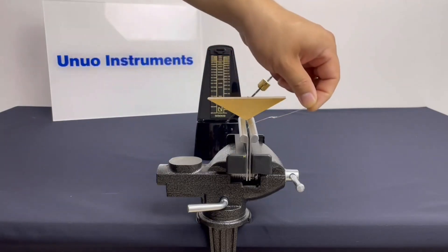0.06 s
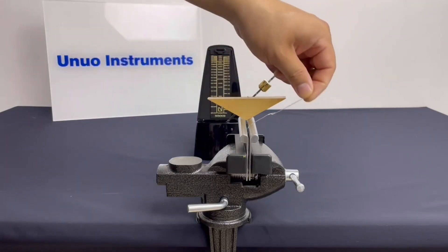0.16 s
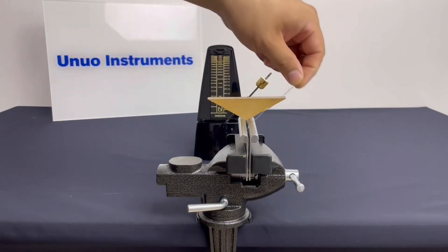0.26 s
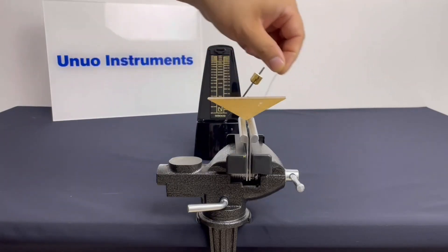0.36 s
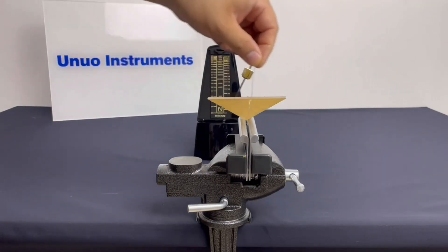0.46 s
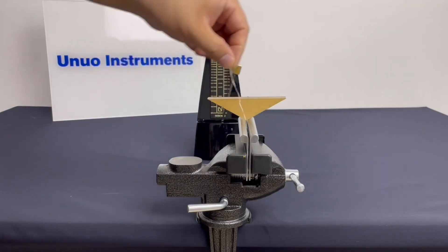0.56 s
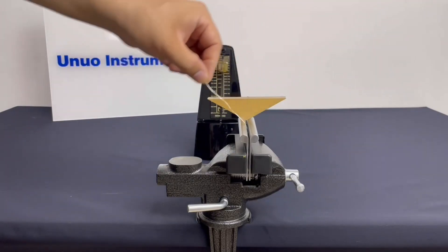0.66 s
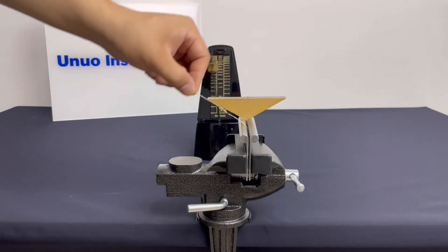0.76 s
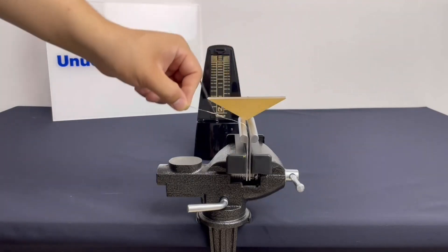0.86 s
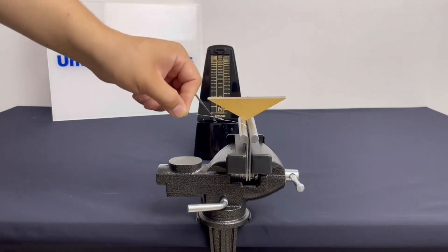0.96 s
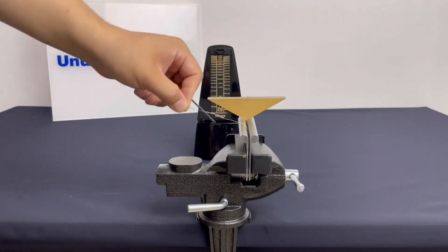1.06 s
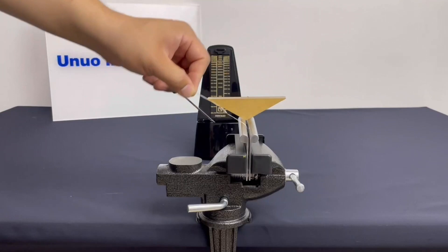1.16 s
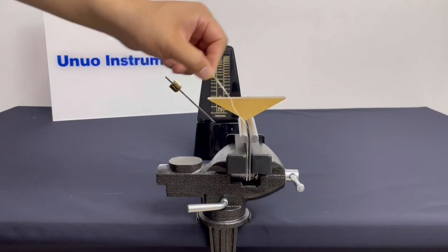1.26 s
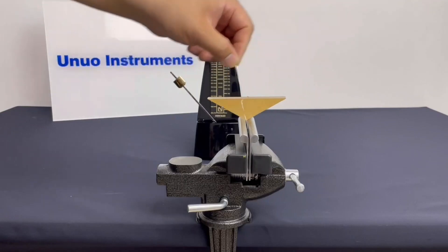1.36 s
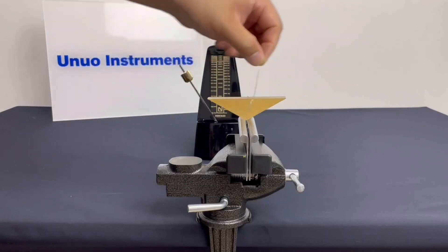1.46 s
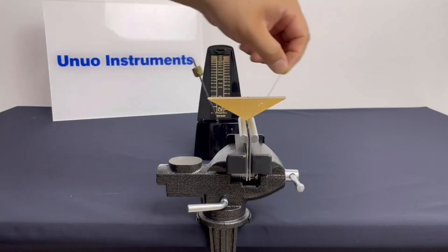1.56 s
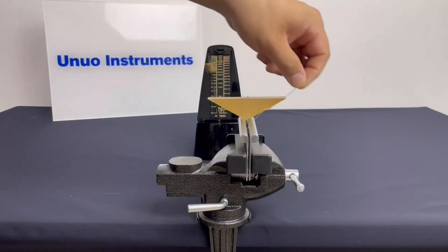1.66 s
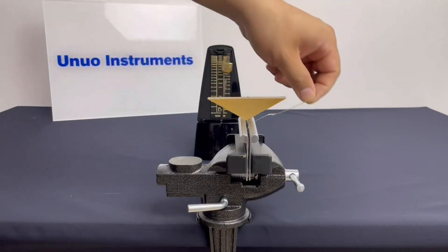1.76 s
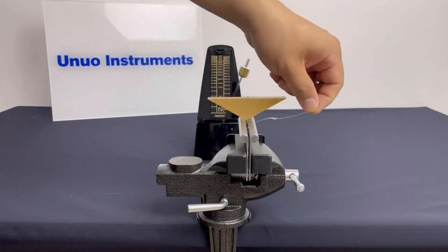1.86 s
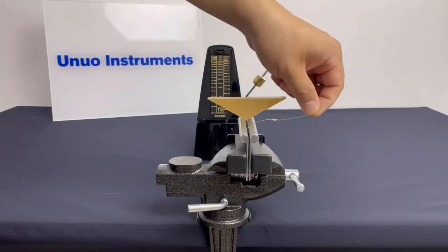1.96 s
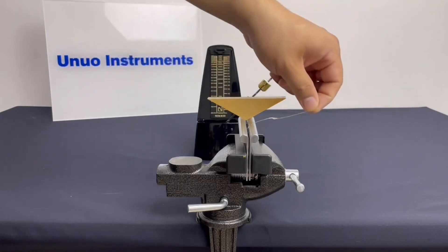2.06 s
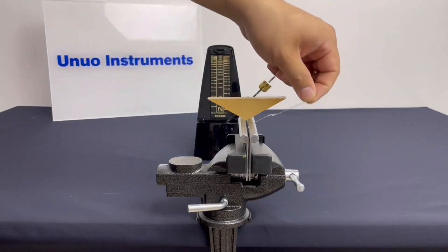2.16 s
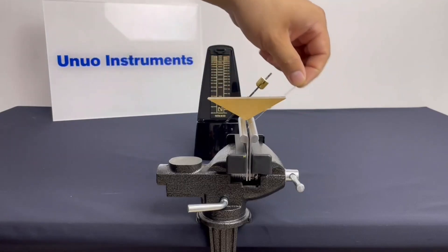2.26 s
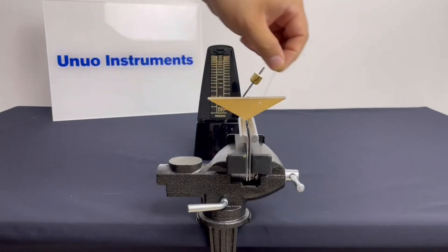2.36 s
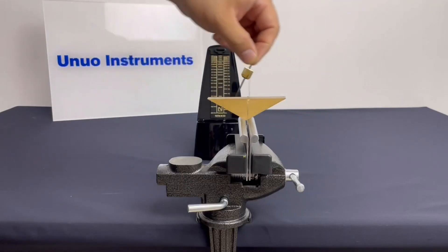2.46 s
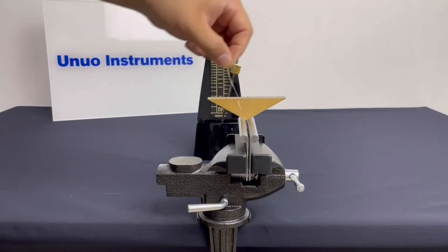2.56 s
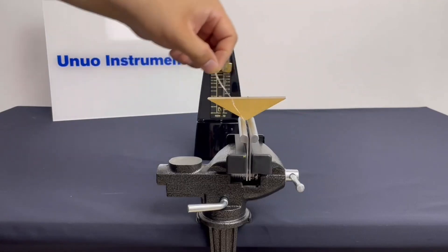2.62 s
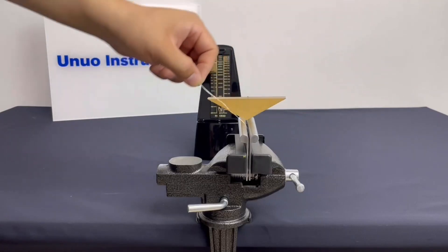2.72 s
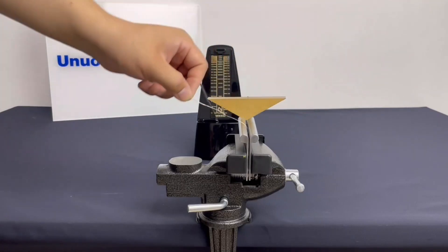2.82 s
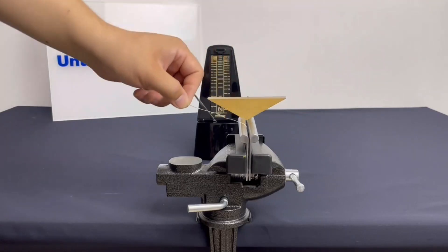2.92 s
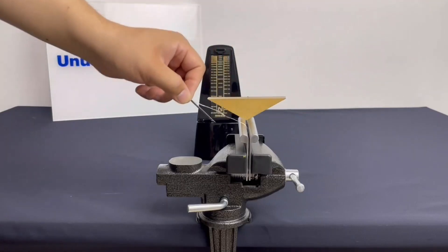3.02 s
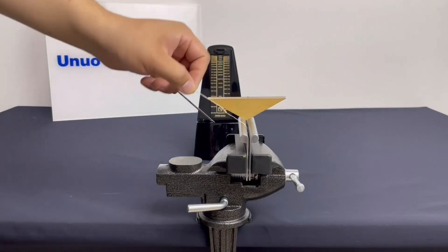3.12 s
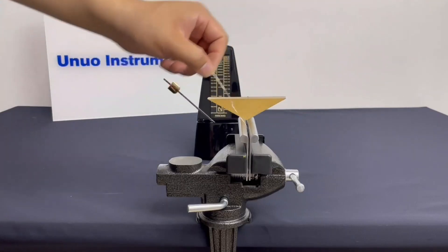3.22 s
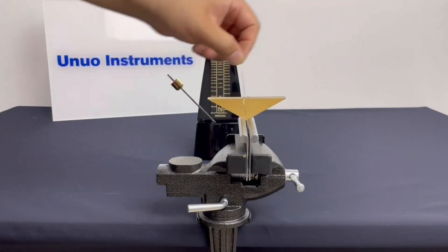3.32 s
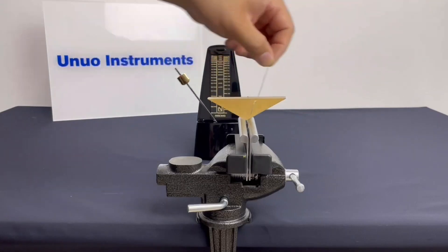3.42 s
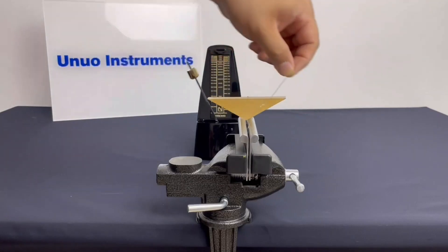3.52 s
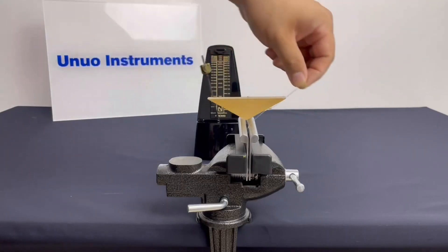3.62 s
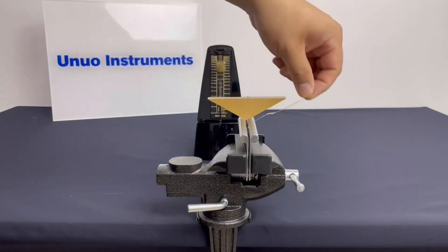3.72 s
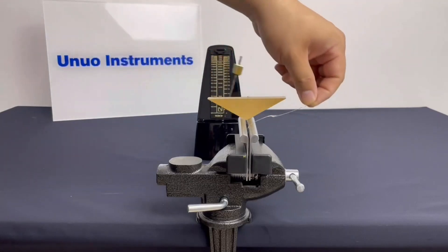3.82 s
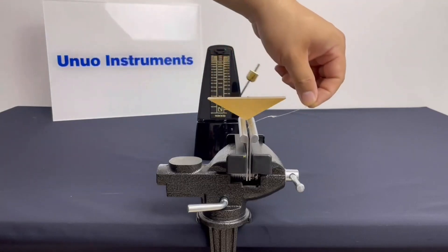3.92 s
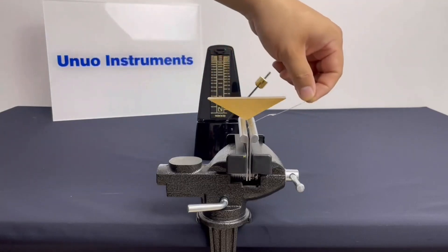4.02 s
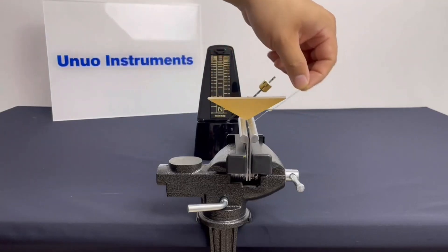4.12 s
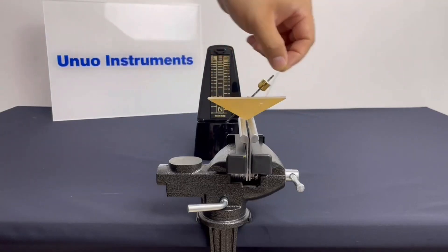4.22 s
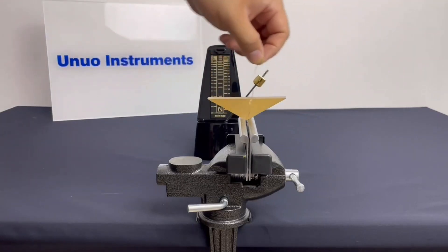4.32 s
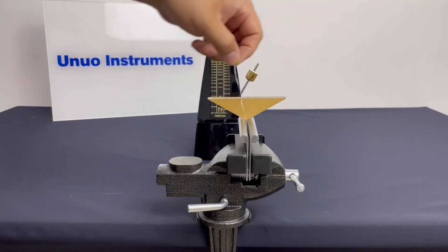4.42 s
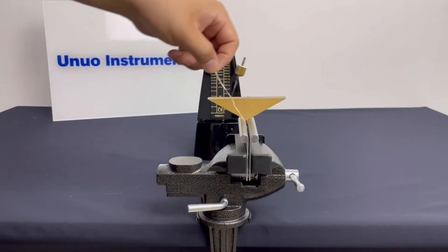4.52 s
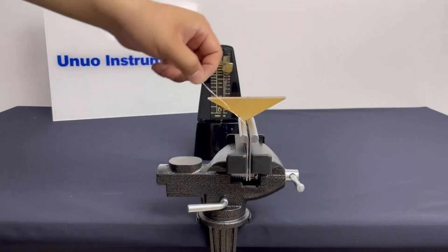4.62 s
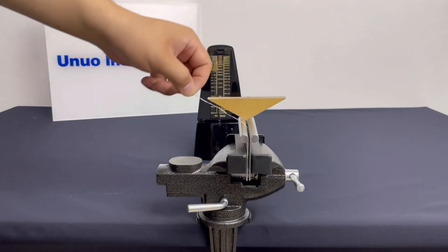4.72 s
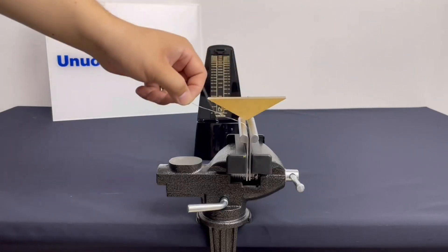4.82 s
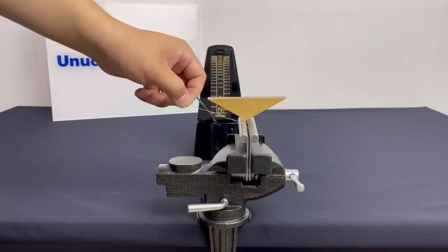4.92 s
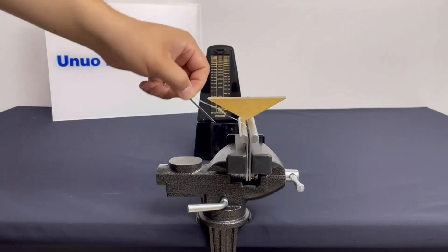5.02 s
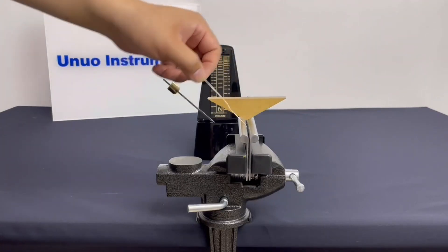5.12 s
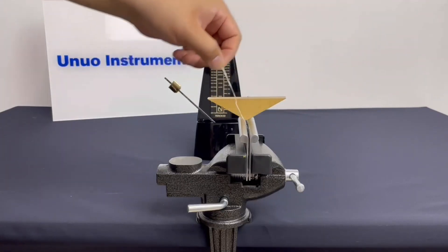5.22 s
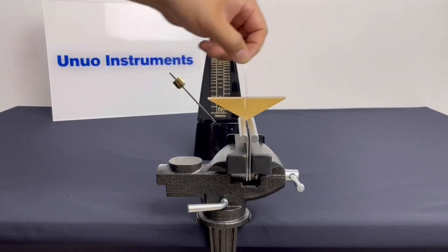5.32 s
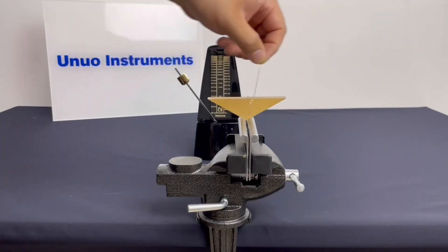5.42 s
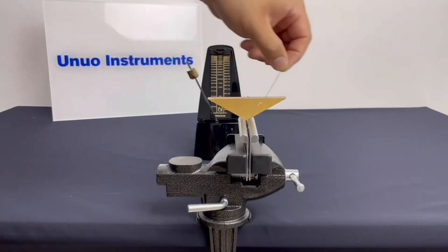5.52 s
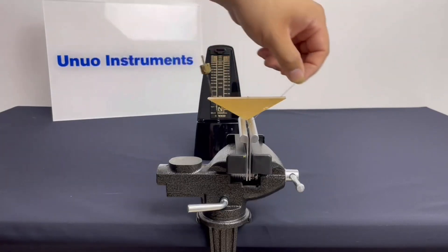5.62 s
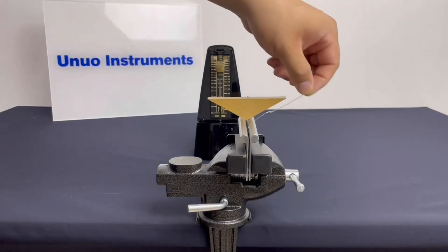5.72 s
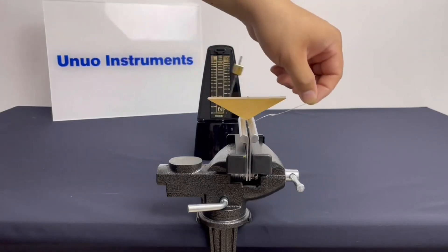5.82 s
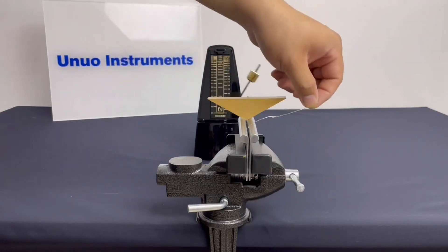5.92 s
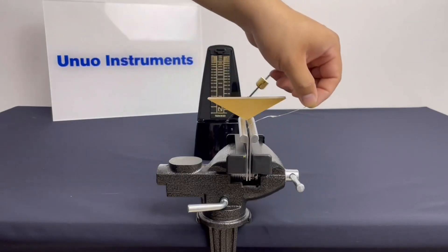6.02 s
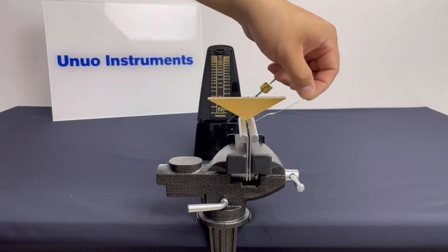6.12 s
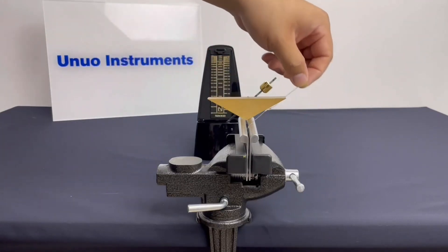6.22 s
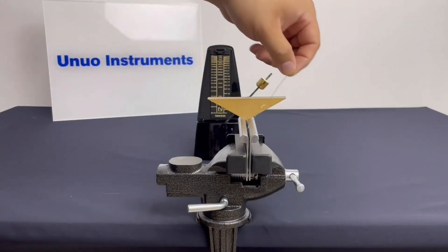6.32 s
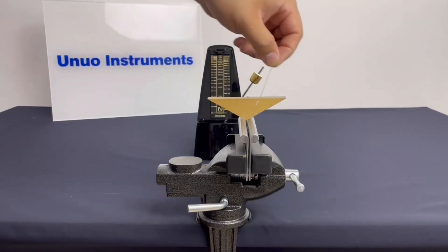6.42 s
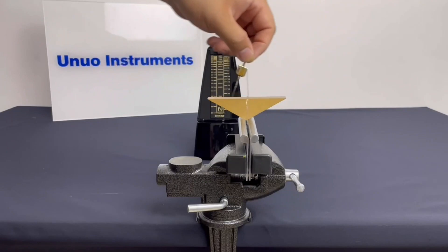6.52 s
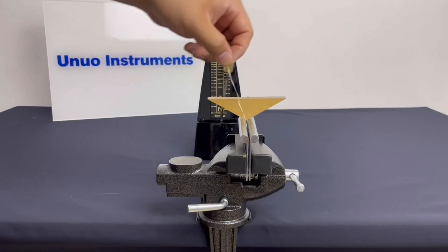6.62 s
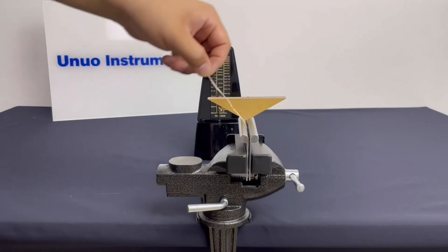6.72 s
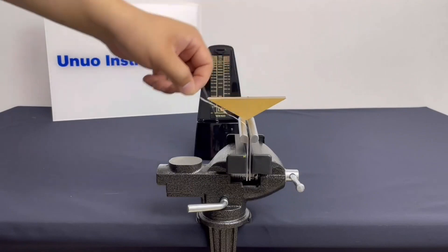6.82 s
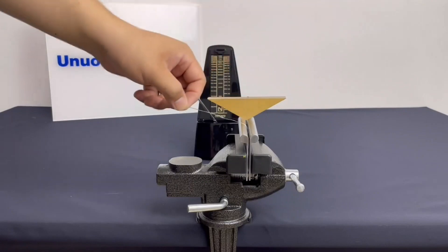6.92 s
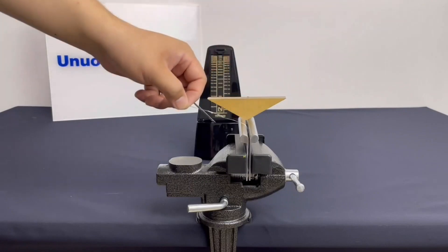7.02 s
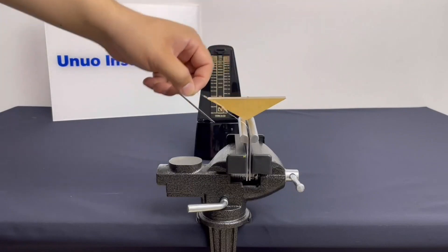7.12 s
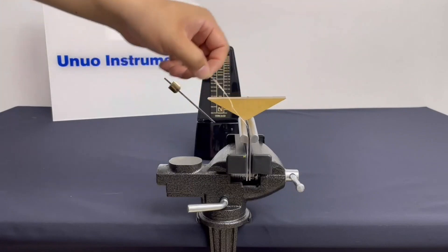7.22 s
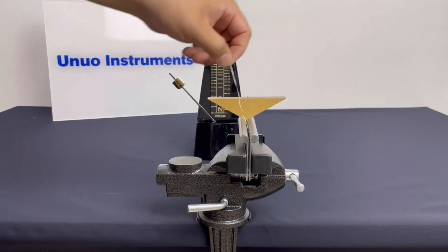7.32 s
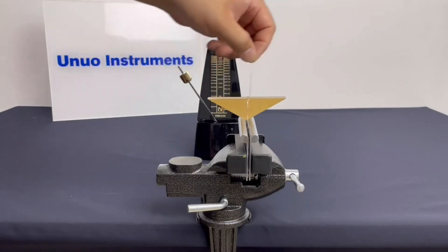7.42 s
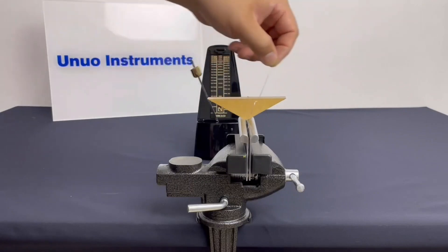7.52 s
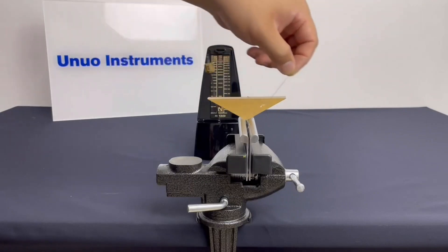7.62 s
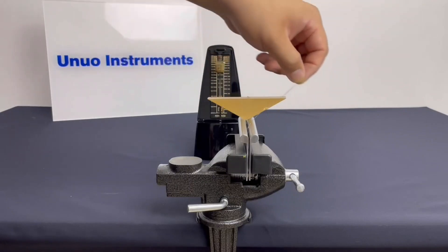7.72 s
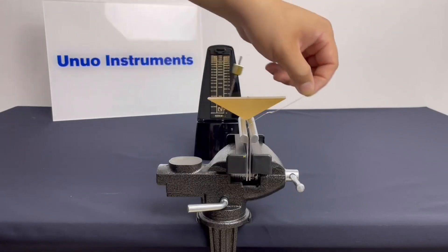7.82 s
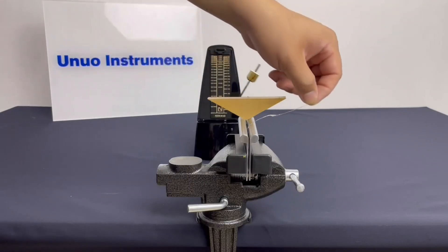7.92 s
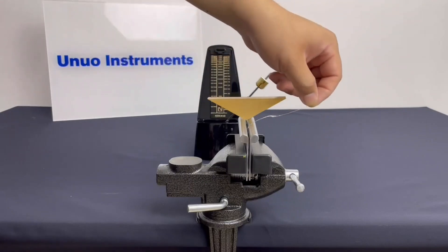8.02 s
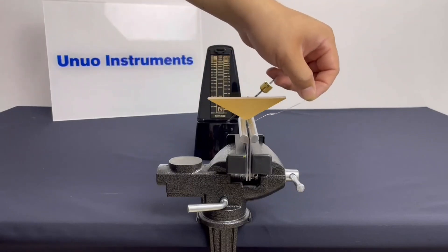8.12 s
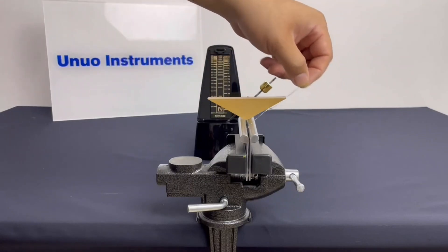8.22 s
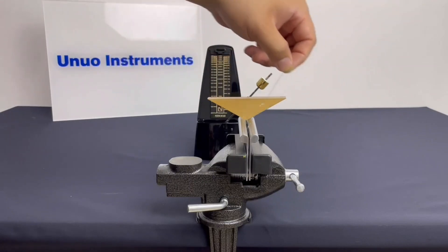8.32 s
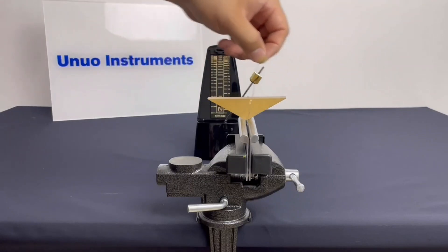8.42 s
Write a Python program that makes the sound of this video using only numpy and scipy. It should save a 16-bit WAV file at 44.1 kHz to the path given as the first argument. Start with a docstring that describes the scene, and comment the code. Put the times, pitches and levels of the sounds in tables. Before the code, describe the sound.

Eight sharp wooden-plastic clicks from a clockwork metronome, evenly spaced at one per second, the ticks a little brighter than the tocks. Each has a short hollow case rattle and a quick small-room tail. Between them a thin, glassy bell tone hangs quietly and shimmers above steady gentle hiss. Low airy gusts brush the microphone, mainly at the start, with a few barely audible crackles midway.

```python
"""Metronome with a faint bell

A pendulum metronome in a plastic case ticks about once a second on a cloth-covered bench in a small room.
Tick and tock are impulses that excite decaying case modes, a noisy rattle and a diffuse room answer.
Each blow sets its little bell ringing anew, tocks most: twin lowest modes beat and higher ones waver.
Filtered noise makes ventilation hiss, throbbing gusts and a few tiny crackles; short low sines make puffs."""
import sys
import numpy as np
from scipy import signal
from scipy.fft import rfft, irfft
from scipy.io import wavfile
from scipy.ndimage import uniform_filter1d

SR = 44100
rng = np.random.default_rng(int(sys.argv[2]) if len(sys.argv) > 2 else 0)


def wrap_up_sound(samples):
    """Save the sound to the file named by the first command line argument, as 16-bit audio."""
    columns = np.atleast_2d(samples).T
    # keep every value between -1 and 1, then stretch to whole-number steps
    tamed = np.clip(columns, -1, 1)
    steps = np.round(tamed * 32767).astype(np.int16)
    wavfile.write(sys.argv[1], SR, steps)


N = 373527

# Bell ring after each beat, beginning with a tock. Each row: start in seconds, upper twin of the lowest
# mode in dB, lower twin in dB, time after the start when the twins first cancel in seconds,
# second mode in dB, its drift in dB per second, third mode in dB.
BELL_RINGS = [(-.19, -44.5, -47.5, .29, -51, -0.9, -32.5), (.82, -48.5, -56.5, 0.17, -49, -15.5, -68),
              (1.802, -45, -48, 0.27, -50.5, 3.5, -41), (2.812, -48.5, -55, 0.14, -50, -7.5, -68),
              (3.81, -45, -46.5, 0.3, -50, 1, -37), (4.82, -48, -55.5, 0.15, -52, -6.5, -68),
              (5.81, -44.5, -51.5, 0.28, -46.5, 1.5, -35), (6.824, -47, -54.5, .15, -48.5, -9, -66),
              (7.811, -44.5, -46.5, .29, -54.5, 14.5, -30.5)]
# Spectrum of the steady hiss. Each row: frequency in Hz, relative level in dB.
HISS_SPECTRUM = [(110, -55.5), (170, -12), (240, -7), (350, -2), (500, -8.5), (760, -11.5), (830, -16.5),
                 (1200, -16), (2300, -21), (4300, -32), (4700, -41), (5500, -56.5), (5800, -71),
                 (8300, -59.5), (9800, -46.5), (12000, -45.5), (14000, -61.5)]
# Gust strength before throbbing. Each row: time in seconds, level of the deepest air in dB.
GUST_LEVELS = [(0.0, -41), (0.16, -28), (0.21, -42.5), (0.52, -62), (0.59, -46), (0.64, -67.5),
               (3.23, -57.5), (3.3, -48.5), (3.35, -67.5), (4.76, -69.5), (4.88, -53), (5.47, -63),
               (5.71, -91), (5.78, -66), (6.16, -73), (6.27, -59.5), (6.67, -100), (6.84, -63),
               (7.62, -58.5), (7.71, -86), (8.0, -70), (8.47, -75)]
# Soft low puffs of air on the microphone. Each row: start in seconds, level in dB, frequency in Hz.
AIR_PUFFS = [(0.6, -32, 189), (1.108, -35.5, 175), (1.466, -31.5, 332), (1.527, -36, 264),
             (3.074, -34.5, 210), (3.289, -45, 129), (4.918, -41, 183), (5.424, -36, 350), (7.6, -40, 253)]
# Escapement blows, tick and tock in turn. Each row: start in seconds, level in dB.
ESCAPEMENT_BLOWS = [(.8182, -6.5), (1.8016, -6.5), (2.8113, -6), (3.81, -6.5), (4.8198, -6), (5.8103, -6.5),
                    (6.8233, -6.5), (7.8106, -7)]
# Case modes. Each row: frequency in Hz, relative level in dB on a tick, relative level in dB on a tock,
# 60 dB decay time in seconds.
CASE_MODES = [(320, -8.5, -16, 0.18), (369.3, -13, -16, 0.21), (424.5, -10.5, -12.5, 0.17),
              (567, -21, -10, 0.089), (683, -7, -7.5, 0.13), (974.4, -7, -10, 0.15),
              (1096.4, -1.5, -4.5, 0.075), (1270, -11.5, -12.5, 0.044), (1408, -1, -2.5, 0.037),
              (1690, -27, -36.5, .04), (1890, 9.5, -5, 0.049), (1966, 4, -2, 0.079),
              (2190, -6.5, -10.5, 0.072), (2572, 8, 1, 0.011), (2460, -25, -15, 0.038),
              (3300, -12, -6.5, 0.044), (3445, -5.5, -12.5, 0.029), (4104, -10, -9.5, .05),
              (4685, -14.5, -18, 0.042), (5125, -14, -23.5, 0.062), (5368, -3.5, -5, 0.038),
              (6850, -24, -17.5, 0.06), (7600, -26, -18.5, .04), (8740, -15.5, -19.5, 0.034),
              (10875, -3, -12, 0.01), (11330, -27, -13, .04), (11300, -15, -16.5, .05)]
# Contacts inside one blow as the tooth lands and chatters. Each row: delay in milliseconds, level in dB.
TOOTH_CONTACTS = [(0, 7.5), (.8, 9.5), (2.9, -5), (4.1, -3.5), (7.6, -18.5), (9.6, -8.5)]
# Spectrum of the case rattle. Each row: frequency in Hz, relative level in dB on a tick,
# relative level in dB on a tock.
RATTLE_SPECTRUM = [(150, -31, -28.5), (300, -6.5, -7.5), (1200, -4, -6.5), (2500, -15.5, -14.5),
                   (3200, -8, -11), (5060, -16.5, -16), (7120, -15, -8.5), (8180, -29, -26.5),
                   (9060, -21.5, -20.5), (11250, -16, -10.5), (13550, -29.5, -36), (14800, -76.5, -56.5)]
# Room answer to a click. Each row: frequency in Hz, relative level in dB, 60 dB decay time in seconds.
ROOM_TAIL = [(151.4, -8, 0.32), (415, 10, 0.5), (730, -6, 0.16), (1030, -7.5, 0.54), (1320, -11, 0.45),
             (1860, -4.5, .4), (2930, -8.5, .42), (4840, 0.5, 0.41), (7900, -7, 0.21), (8200, -19, 0.45),
             (8500, -5, 1), (11900, -5.5, 0.28), (13880, -5, .3), (14800, -15.5, .3)]
# Tiny crackles. Each row: start in seconds, level in dB.
CRACKLE_SNAPS = [(2.612, -59), (4.371, -54.5), (4.3974, -58), (4.4114, -55), (4.4205, -51)]

BELL_LOW_HZ, BELL_MID_HZ, BELL_TOP_HZ = 1995.5, 5244.8, 9449.
TWIN_GAP_HZ = 3.23
BELL_LOW_T60, BELL_TOP_T60 = 5.65, 0.43  # seconds
# the second mode wavers slowly after a tick, barely after a tock
WAVER_HZ, WAVER_PEAK_S, TICK_WAVER_DB, TOCK_WAVER_DB = 2.9, 0.32, 1.5, 0.3
HISS_DB = -47.5
# the rush above the deepest air follows the gusts more gently; it has RUSH_DB at a gust level of CALM_DB
RUSH_DB, RUSH_DB_PER_GUST_DB, CALM_DB = -52.5, 0.43, -64
RECORDER_TOP_HZ = 14900


def undb(db):
    """Logarithmic level: decibels to amplitude gain."""
    return 10 ** (np.asarray(db) / 20)


def colour(x, hz, db):
    """Spectral shaping: points joined on a log-frequency axis weight the spectrum; rms 1."""
    f = np.maximum(np.fft.rfftfreq(len(x), 1 / SR), 1)
    gain = undb(np.interp(np.log(f), np.log(hz), db))
    y = irfft(rfft(x) * gain, len(x))
    return y / np.std(y)


def band(x, lo_hz, hi_hz):
    """Band-pass filtering, kept only once the filter has settled; rms 1."""
    sos = signal.butter(3, [lo_hz, hi_hz], "bandpass", fs=SR, output="sos")
    y = signal.sosfilt(sos, np.tile(x, 2))[len(x):]
    return y / np.std(y)


def fall(t, t60):
    """Exponential decay by 60 dB in t60 seconds, silent before time zero."""
    return (t >= 0) * np.exp(-np.log(1000) * np.maximum(t, 0) / t60)


def walk(rate):
    """Slow random fluctuation: levels held 1 / rate s and smoothed twice; spread near 1."""
    hold = int(SR / rate)
    held = np.repeat(rng.standard_normal(N // hold + 1), hold)
    slewed = uniform_filter1d(uniform_filter1d(held, hold), hold)
    return 1.3 * slewed[:N]


def add(out, sound, s):
    """Superposition: mix a sound in at a time in seconds."""
    i = int(s * SR)
    out[i:i + len(sound)] += sound[:N - i]


def bell(t):
    """Modal beating: twin modes a few hertz apart interfere; each blow replaces the ring with a new one."""
    low_and_top, mid_db = np.zeros(N), np.zeros(N)
    ends = [row[0] for row in BELL_RINGS[1:]] + [N / SR]
    for k, (row, end) in enumerate(zip(BELL_RINGS, ends)):
        s, upper_db, lower_db, cancel_s, db, drift_db, top_db = row
        age = t - s
        upper_phase = 2 * np.pi * BELL_LOW_HZ * age
        lower_phase = upper_phase - 2 * np.pi * TWIN_GAP_HZ * (age - cancel_s)
        twins = undb(upper_db) * np.sin(upper_phase) - undb(lower_db) * np.sin(lower_phase)
        twins = twins * fall(age, BELL_LOW_T60)
        # the third mode builds up gradually, flutters and decays
        top = undb(top_db) * (1 - fall(age, 0.2)) ** 2 * np.sin(2 * np.pi * BELL_TOP_HZ * age)
        top = top * fall(age, BELL_TOP_T60) * undb(1.9 * walk(40))
        low_and_top += (t < end) * (twins + top)
        # odd rows follow a tick
        depth_db = TICK_WAVER_DB if k % 2 else TOCK_WAVER_DB
        waver_db = depth_db * np.cos(2 * np.pi * WAVER_HZ * (age - WAVER_PEAK_S))
        mid_db += (age >= 0) * (t < end) * (db + drift_db * age + waver_db)
    mid_db = uniform_filter1d(mid_db, size=SR // 100)
    # the other modes swell and sink with the second, but less
    low_and_top = low_and_top * undb(0.45 * (mid_db - mid_db.mean()))
    flutter = undb(1.5 * walk(30) + 0.77 * walk(370))
    mid = np.sqrt(2) * undb(mid_db) * flutter * np.sin(2 * np.pi * BELL_MID_HZ * t)
    return low_and_top + mid


def ventilation_hiss():
    """Broadband noise: a steady spectrum whose level wavers slowly below 7 kHz and flickers above."""
    hiss = colour(rng.standard_normal(N), *np.transpose(HISS_SPECTRUM))
    low = signal.sosfiltfilt(signal.butter(4, 7000, fs=SR, output="sos"), hiss)
    high = hiss - low
    return undb(HISS_DB) * (low * undb(0.44 * walk(7.2)) + high * undb(1.5 * walk(26)))


def gusts(t):
    """Turbulence: two low noise bands share one throb while their levels follow the gusts."""
    gust_db = np.interp(t, *np.transpose(GUST_LEVELS))
    throb = walk(11)
    deep = band(rng.standard_normal(N), 55, 122.6)
    deep = deep * undb(gust_db + 2.85 * throb + 1.2 * walk(30))
    # the rush grows no further once a gust passes -48 dB
    rush_db = RUSH_DB + RUSH_DB_PER_GUST_DB * (np.minimum(gust_db, -48) - CALM_DB)
    rush = band(rng.standard_normal(N), 120, 268)
    rush = rush * undb(rush_db + 2.5 * throb + 1.2 * walk(22))
    return deep + rush


def puffs():
    """Windowed oscillation: each puff is about three cycles of a low sine under a smooth hump."""
    out = np.zeros(N)
    for s, db, hz in AIR_PUFFS:
        t = np.arange(int(3.2 * SR / hz)) / SR
        add(out, undb(db) * np.hanning(len(t)) * np.sin(2 * np.pi * hz * t), s)
    return out


def case_ring(side, t):
    """Modal excitation: the train of tooth contacts is convolved with the decaying modes of the case."""
    modes = 0
    for k, (hz, *db, t60) in enumerate(CASE_MODES):
        # each mode's share varies a little from blow to blow
        size = undb(db[side] + 1.2 * rng.standard_normal())
        modes = modes - (-1) ** k * size * fall(t, t60) * np.sin(2 * np.pi * hz * t)
    push = np.zeros(SR // 50)
    for ms, db in TOOTH_CONTACTS:
        push[int(ms * SR / 1000)] = undb(db)
    ring = signal.fftconvolve(modes, push)[:len(t)]
    return ring / np.abs(ring).max()


def room_tail(t, grain):
    """Diffuse reverberation: noise bands half an octave apart, each with its own decay."""
    hz, db, t60 = np.transpose(ROOM_TAIL)
    noise = rfft(colour(grain, hz, db))
    octave = np.log2(np.maximum(np.fft.rfftfreq(len(t), 1 / SR), 1))
    out = 0
    for centre in np.arange(7, 14.5, .5):  # log2 of the centre in Hz
        share = np.clip(1 - 2 * np.abs(octave - centre), 0, 1)
        decay = fall(t, np.interp(centre, np.log2(hz), t60))
        out = out + irfft(noise * share, len(t)) * decay
    # the reverberation builds up gradually
    return out * (1 - fall(t, 0.022))


def blow(side, t, grain):
    """Impact and response: contacts ring the case modes, the case rattles, the room answers."""
    table = np.transpose(RATTLE_SPECTRUM)
    rattle = fall(t, 0.049) * colour(grain[0], table[0], table[1 + side])
    # the tooth comes to rest at the last contact and damps the movement
    at_rest = 1. * (t > TOOTH_CONTACTS[-1][0] / 1000 + .0015)
    damping = undb(-4. * uniform_filter1d(at_rest, size=40))
    onset = 1 - fall(t, 0.0024)
    direct = onset * damping * (case_ring(side, t) + undb(-8.0) * rattle)
    # the small case radiates no bass
    direct = signal.sosfilt(signal.butter(4, 270, "highpass", fs=SR, output="sos"), direct)
    # the first 6 ms of the blow excite the room
    echo = signal.fftconvolve(direct[:SR // 160], room_tail(t, grain[1]))[:len(t)]
    return direct + undb(-34.0) * echo / np.std(echo)


def metronome():
    """Repeated impact: ticks and tocks alternate, and case and room answer every blow much alike."""
    out, t = np.zeros(N), np.arange(SR // 2) / SR
    shared_grain = rng.standard_normal((2, len(t)))
    for k, (s, db) in enumerate(ESCAPEMENT_BLOWS):
        grain = shared_grain + .5 * rng.standard_normal(shared_grain.shape)
        add(out, undb(db) * blow(k % 2, t, grain), s)
    return out


def crackles():
    """Transient noise: short bright snaps are treble noise under a fast exponential decay."""
    out, t = np.zeros(N), np.arange(SR // 50) / SR
    for s, db in CRACKLE_SNAPS:
        snap = fall(t, 0.015) * band(rng.standard_normal(len(t)), 8600, 17000)
        add(out, undb(db) * snap, s)
    return out


def scene():
    """Superposition: the pressures of all sources add at one microphone."""
    t = np.arange(N) / SR
    clockwork = metronome() + bell(t)
    air = ventilation_hiss() + gusts(t) + puffs()
    return (clockwork + air + crackles())[None]


def record(dry):
    """Band limiting: the microphone loses deepest bass and highest treble; the recorder cuts the top."""
    mic = signal.sosfilt(signal.butter(2, 55, "highpass", fs=SR, output="sos"), dry)
    mic = signal.sosfilt(signal.butter(4, 13800, fs=SR, output="sos"), mic)
    return signal.sosfilt(signal.ellip(8, .2, 70, RECORDER_TOP_HZ, fs=SR, output="sos"), mic)


dry = scene()
out = record(dry)
wrap_up_sound(out)
```